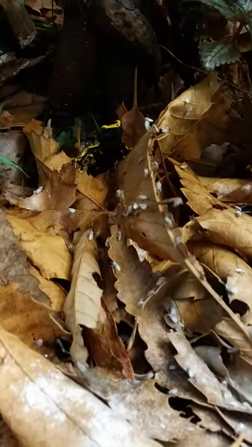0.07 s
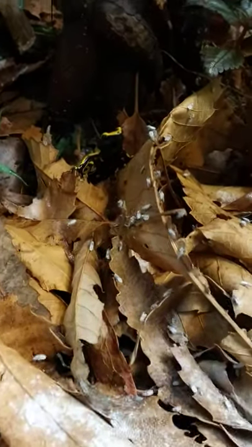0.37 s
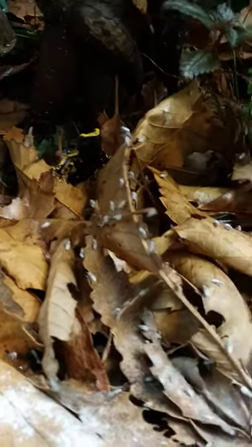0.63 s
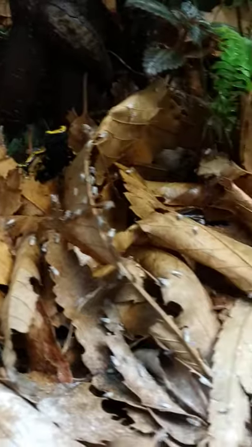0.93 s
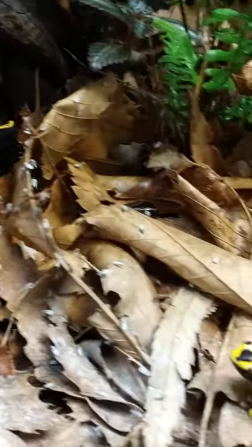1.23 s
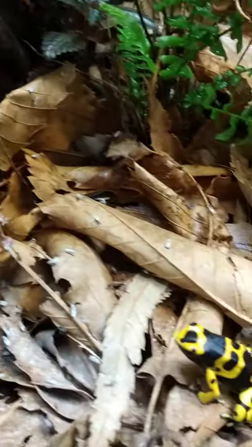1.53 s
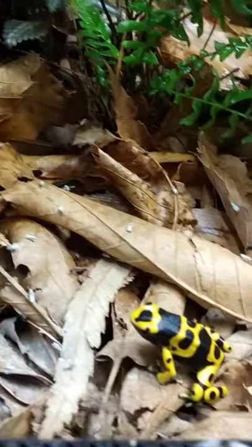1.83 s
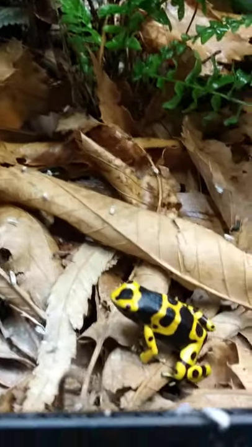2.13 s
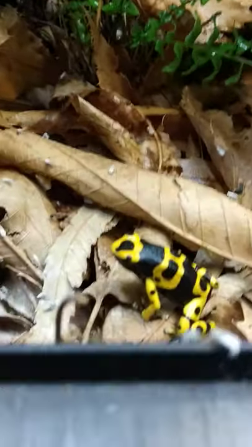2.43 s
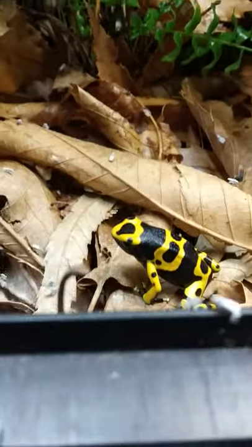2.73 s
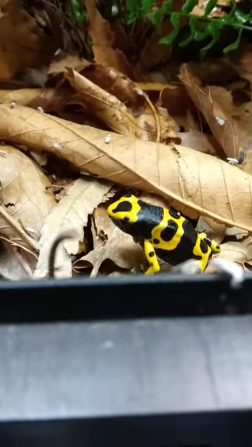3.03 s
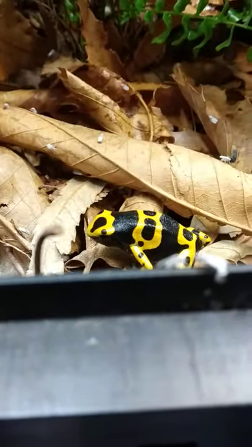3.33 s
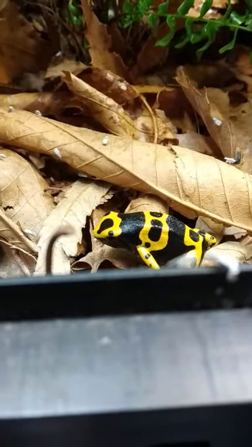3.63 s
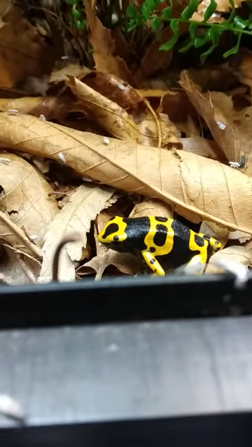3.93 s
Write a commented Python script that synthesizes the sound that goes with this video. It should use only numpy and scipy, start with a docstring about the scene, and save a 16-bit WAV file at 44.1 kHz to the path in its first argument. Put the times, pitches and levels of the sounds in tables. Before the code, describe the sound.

Quiet room tone beside a terrarium, with a steady appliance hum and light hiss. Close handling adds soft rubbing and tiny ticks, followed by small knocks in the second half before the fingers settle.

```python
"""A quiet room with a hand-held microphone over a glass terrarium.
From the start an appliance hums on the mains over faint rumble and hiss, and fingers rub softly on the
device. Near 0.75 s come soft swishes and a cluster of crisp ticks on the right. The hum changes colour
as the microphone moves back, and from 2 s the case gives dull little knocks on the left, among more
ticks. By 3.5 s the fingers settle, leaving the room tone."""
import sys
import numpy as np
from scipy import signal
from scipy.io import wavfile

SR = 44100
rng = np.random.default_rng(int(sys.argv[2]) if len(sys.argv) > 2 else 0)


def store_wav(level_fs):
    """Save 16-bit WAV to argv[1]."""
    pcm = np.round(np.clip(np.atleast_2d(level_fs), -1, 1) * 32767)
    wavfile.write(sys.argv[1], SR, pcm.T.astype(np.int16))


N = 176400
TIME = np.arange(N) / SR


def from_db(db):
    """Decibels to gain."""
    return 10 ** (np.asarray(db) / 20)


def unit_rms(x):
    """Scale to an rms of 1."""
    return x / np.sqrt(np.mean(x ** 2) + 1e-20)


def pan(db):
    """Constant-power stereo gains; positive dB leans left."""
    return unit_rms(from_db([[db / 2], [-db / 2]]))


def envelope(points):
    """Join (seconds, value) breakpoints with straight lines."""
    return np.interp(TIME, *np.transpose(points))


def at_hz(points, hz):
    """Read (Hz, value) breakpoints on a log-frequency axis."""
    freqs, values = np.transpose(points)
    return np.interp(np.log(hz), np.log(freqs), values)


def butter(x, hz, kind, order=2):
    """A causal Butterworth filter."""
    return signal.sosfilt(signal.butter(order, hz, kind, fs=SR, output="sos"), x + 1e-18)


def resonate(x, hz, width_hz):
    """A band-pass resonance with unity gain at its peak."""
    r = np.exp(-np.pi * width_hz / SR)
    feedback = [1, -2 * r * np.cos(2 * np.pi * hz / SR), r * r]
    return signal.lfilter(np.array([1, 0, -1]) * (1 - r * r) / 2, feedback, x + 1e-18)


def drift(rate_hz):
    """A smooth random modulator of rms 1."""
    return unit_rms(butter(rng.standard_normal(N + SR), rate_hz, "low")[SR:])


def sine(hz):
    """A tone of rms 1 at a random phase."""
    return np.sqrt(2) * np.sin(2 * np.pi * (hz * TIME + rng.random()))


def banded_noise(spectrum, flicker_db, correlation=None):
    """Stereo noise of rms 1 in roughly third-octave bands, each flickering on its own."""
    out, edges = 0, np.geomspace(20, 17000, 34)
    white = rng.standard_normal((2, 2, N))
    for k, (low, high) in enumerate(zip(edges, edges[1:])):
        mid, side = butter(white[k % 2], [low, high], "band")
        hz = np.sqrt(low * high)
        alike = at_hz(correlation, hz) if correlation else 0
        gain = from_db(at_hz(spectrum, hz) + flicker_db * drift(rate_hz=17.6))
        out += gain * (np.sqrt(1 + alike) * mid + np.sqrt(1 - alike) * side * [[1], [-1]])
    return unit_rms(out)


def air():
    """The room's bed of rumble and hiss, narrowest in the low mids and wide on top."""
    # Each row: frequency in Hz, relative noise density in dB.
    spectrum = [(20, -2), (32, 0.5), (48, -1.5), (65, -7.5), (85, 0.5), (150, -10), (260, -13.5),
                (335, -8.5), (420, -16.5), (640, -15), (800, -19.5), (1100, -18), (1800, -20.5),
                (4500, -23.5), (6500, -24.5), (8300, -20.5), (11500, -21), (13700, -27.5), (15500, -21.5)]
    # Each row: frequency in Hz, left-right correlation from 0 to 1.
    correlation = [(25, 0), (100, 0.67), (300, 0.67), (700, 0.35), (1500, 0.048), (4000, 0)]
    return from_db(-63) * banded_noise(spectrum, flicker_db=0.9, correlation=correlation)


def appliance_hum():
    """Mains harmonics, whose balance shifts as the microphone moves, over faint wavering motor tones."""
    # Each row: harmonic number, level in dB, pan in dB, level change in dB when fully moved back.
    harmonics = [(1, -49, -4.5, -0.95), (2, -80.5, 15, 5), (3, -83.5, -1, 3), (4, -97, 5.5, 9.5),
                 (5, -82.5, 1.5, 0)]
    # Each row: frequency in Hz, level in dB, waver depth in dB.
    motor_tones = [(99.5, -71, -2.6), (316, -87, 4), (341, -88.5, 4)]
    # Each row: time in seconds, how far back the microphone is from 0 to 1.
    retreat = [(0, 0.24), (1.3, 0.03), (2.6, 1), (4, 1)]
    hum_hz, hum_waver_db = 120, 0.67
    moved = envelope(retreat)
    mains = sum(from_db(db + change_db * moved) * pan(pan_db) * sine(k * hum_hz)
                for k, db, pan_db, change_db in harmonics)
    motor = sum(from_db(db + waver_db * drift(rate_hz=1.6)) * sine(hz)
                for hz, db, waver_db in motor_tones)
    return mains * from_db(hum_waver_db * drift(rate_hz=4.8)) + motor


def hand_sway():
    """The moving hand puts a deep rumble into the microphone."""
    rumble = butter(rng.standard_normal(N + SR), [8.55, 25.137], "band")[SR:]
    return from_db(-67) * unit_rms(rumble)


def finger_rub():
    """Fingers shift on the case: broad friction noise that swells and ebbs, a little to the left."""
    # Each row: time in seconds, level in dB.
    levels = [(0, -68.5), (.6, -69.5), (.85, -66.5), (1.15, -62), (1.65, -66), (1.9, -62.5), (2.0, -68),
              (2.15, -62.5), (2.3, -67.5), (2.42, -60.5), (2.56, -74.5), (3.1, -73), (3.33, -68),
              (3.5, -97), (4, -93)]
    # Each row: frequency in Hz, relative noise density in dB.
    spectrum = [(300, 4.5), (1200, -9.5), (2500, -11), (4500, -8), (5500, -4), (6600, -1), (8300, 0.5),
                (11000, -4), (12700, -7), (15400, -8)]
    return from_db(envelope(levels)) * pan(4.5) * banded_noise(spectrum, flicker_db=0.5)


def swishes():
    """Fluttering friction rises and falls through a midrange resonance and a weaker, lower one."""
    # Each row: peak time in seconds, half length in seconds, level in dB.
    swells = [(0.735, 0.2, -74), (1.06, 0.19, -72), (2.352, 0.48, -78)]
    upper_hz, width_hz, flutter_db = 947, 270, 2.2
    friction = rng.standard_normal((2, N)) * from_db(flutter_db * drift(rate_hz=14))
    upper = unit_rms(resonate(resonate(friction, upper_hz, width_hz), upper_hz, width_hz))
    body = unit_rms(resonate(friction, hz=336, width_hz=55))
    swell = sum(from_db(db) * np.exp(-((TIME - peak_s) / half_s) ** 2) for peak_s, half_s, db in swells)
    return swell * (pan(-3) * upper - from_db(-4) * body)


def ticks():
    """A sharp click and a tiny burst of slips excite one high resonance, with a broad crack."""
    # Each row: start in seconds, level in dB, ring pitch in Hz, ring width in Hz, slip decay in
    # seconds, the click's share of the contact energy, crack level against the ring in dB.
    hits = [(0.7594, -52.5, 7500, 6000, 0.001, 0.3, -9), (0.7629, -46, 8400, 3400, 0.0015, 0.45, -8.5),
            (0.7665, -49, 8400, 3400, 0.003, 0.4, -8), (0.7840, -44.5, 8100, 2000, 0.0008, 0.6, -11.5),
            (2.3519, -44.5, 6100, 4400, 0.0025, 0.75, -3.5), (3.155, -64, 7800, 3000, 0.006, 0.1, -15),
            (3.2743, -41.3, 7650, 1500, 0.0016, 0.75, -14), (3.2834, -52.5, 7400, 5500, 0.004, 0.2, -4),
            (3.354, -61, 8000, 1500, 0.005, 0.1, -18)]
    # The crack's lower and upper edges in Hz.
    crack_band = [1300, 6000]
    out = np.zeros(N)
    for start, db, hz, width_hz, decay_s, sharpness, crack_db in hits:
        age = TIME - start
        click = unit_rms(signal.unit_impulse(N, int(start * SR)))
        slips = unit_rms(rng.standard_normal(N) * (age >= 0) * np.exp(-np.abs(age) / decay_s))
        contact = np.sqrt(sharpness) * click + np.sqrt(1 - sharpness) * slips
        ring = unit_rms(resonate(resonate(contact, hz, width_hz), hz, width_hz))
        crack = unit_rms(butter(contact, crack_band, "band", order=1))
        tick = unit_rms(butter(ring + from_db(crack_db) * crack, 12000, "low", order=4))
        duty = decay_s * SR / (2 * N)  # sets the level over the tick's own short length
        out += from_db(db) * tick * np.sqrt(duty)
    return out


def room_tail(x, t60_s):
    """The room answers with a short diffuse tail, different on each side."""
    age = TIME[:SR // 2]
    tail = rng.standard_normal((2, len(age))) * from_db(-60 * age / t60_s)
    tail /= np.sqrt(np.sum(tail ** 2) / 2)
    return signal.fftconvolve(x[None], tail, axes=1)[:, :N]


def case_knocks():
    """A soft contact rings the damped modes of the case; harder ones begin with a bright snap."""
    # Each row: start in seconds, body peak in dB, pitch ratio, contact low-pass in Hz, snap peak in dB.
    hits = [(2.0456, -40.5, 0.95, 786, -56), (2.2239, -35.5, 1.01, 1030, -34.5),
            (2.2567, -46, 0.7, 650, -68), (2.393, -37.5, 0.65, 1320, -38), (3.2012, -40.5, 0.86, 1580, -42)]
    # Each row: frequency in Hz, relative level in dB, time to fall 60 dB in seconds.
    case_modes = [(360, 2.5, 0.0065), (645, 4.5, 0.011), (1190, -16, 0.0025)]
    # Each row: frequency in Hz, width in Hz, relative level in dB.
    snap_modes = [(1740, 530, 1), (3000, 1400, 1), (7100, 3700, -2)]
    out = np.zeros(N)
    for start, body_db, pitch, contact_hz, snap_db in hits:
        click = signal.unit_impulse(N, int(start * SR))
        body = 0
        for hz, db, t60_s in case_modes:
            width_hz = np.log(1000) / (np.pi * t60_s)
            body += from_db(db) * width_hz * resonate(click, hz * pitch, width_hz)
        body = butter(body, contact_hz, "low", order=3)
        body = butter(body, 110, "high", order=1)
        snap = -sum(from_db(db) * resonate(click, hz, width_hz) for hz, width_hz, db in snap_modes)
        out += from_db(body_db) * body / np.abs(body).max()
        out += from_db(snap_db) * snap / np.abs(snap).max()
    return out


def scene():
    """Room tone and handling noise, ticks on the right with a touch of reverb, knocks hard left."""
    bed = air() + appliance_hum()
    handling = hand_sway() + finger_rub() + swishes()
    crisp = ticks()
    reverb = from_db(-6) * pan(-2.5) * room_tail(crisp, t60_s=0.15)
    return bed + handling + pan(-22) * crisp + reverb + pan(31) * case_knocks()


def record(dry):
    """A steep low-pass takes off the very top."""
    cutoff_hz = 15700
    return signal.sosfilt(signal.ellip(12, .1, 80, cutoff_hz, fs=SR, output="sos"), dry)


dry = scene()
out = record(dry)
store_wav(out)
```